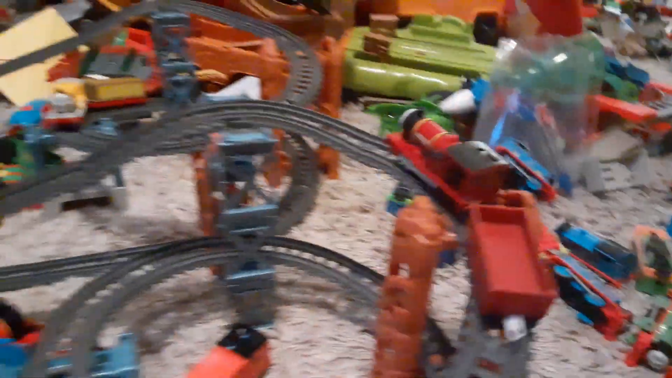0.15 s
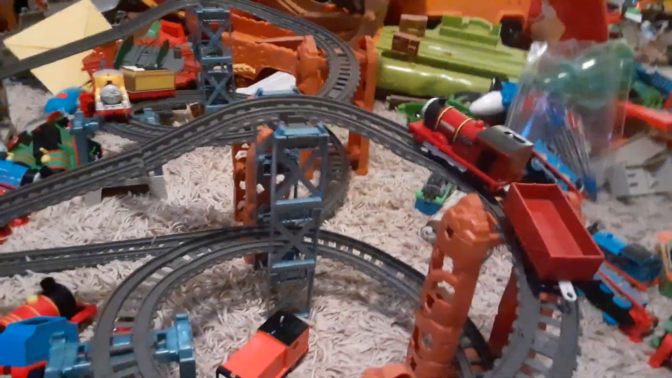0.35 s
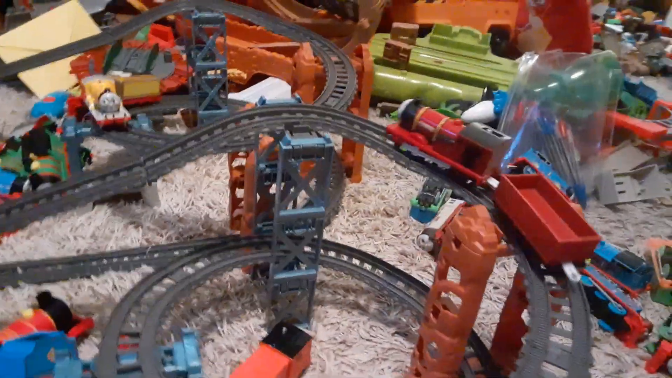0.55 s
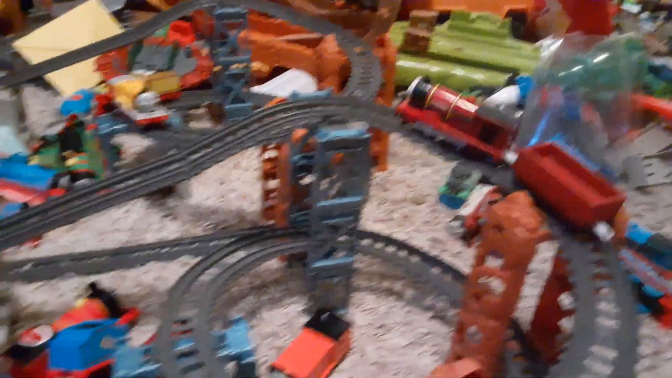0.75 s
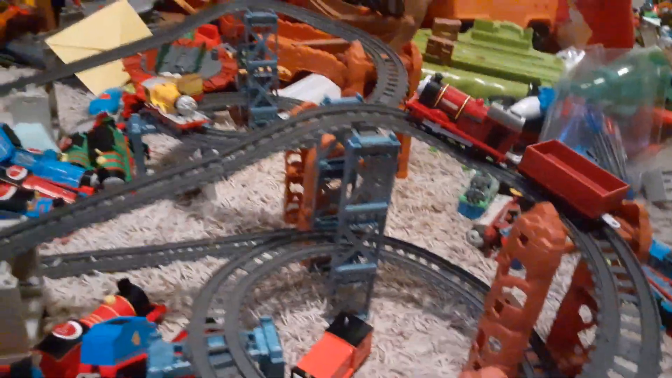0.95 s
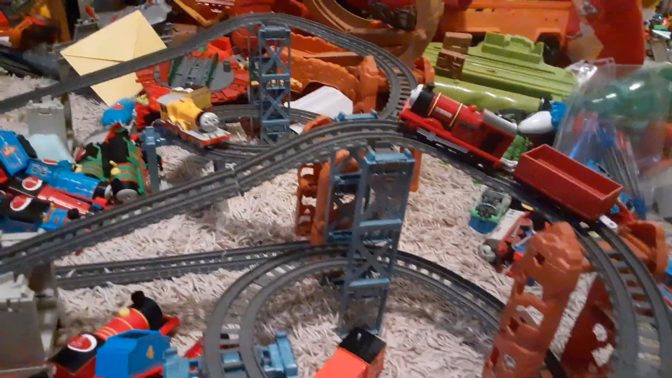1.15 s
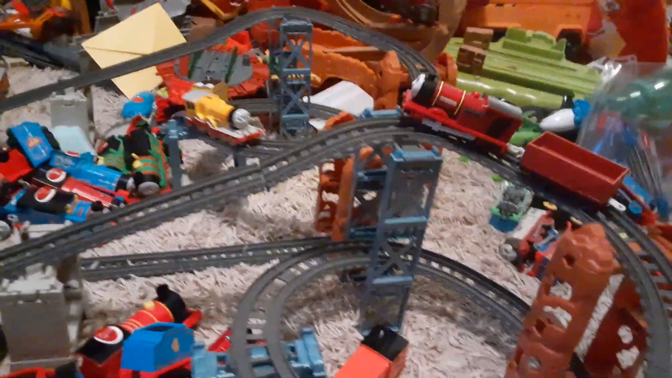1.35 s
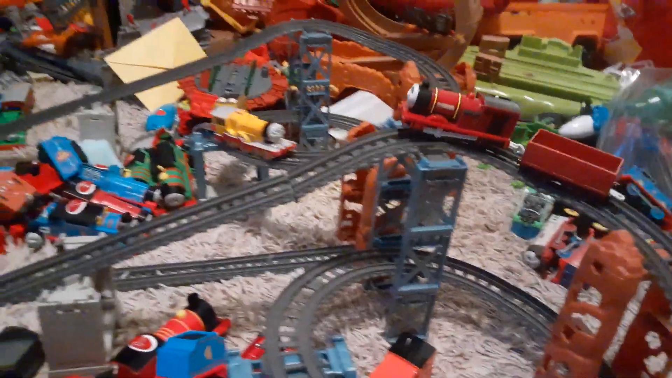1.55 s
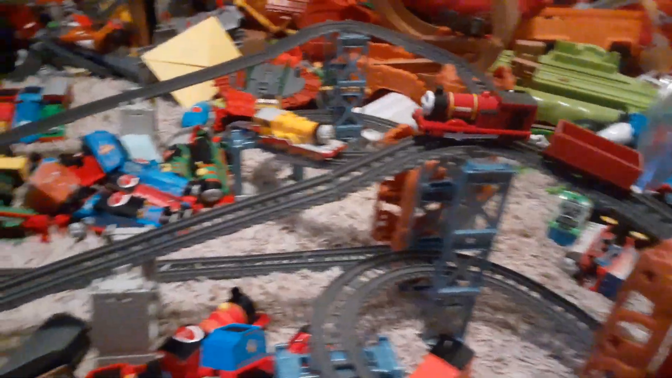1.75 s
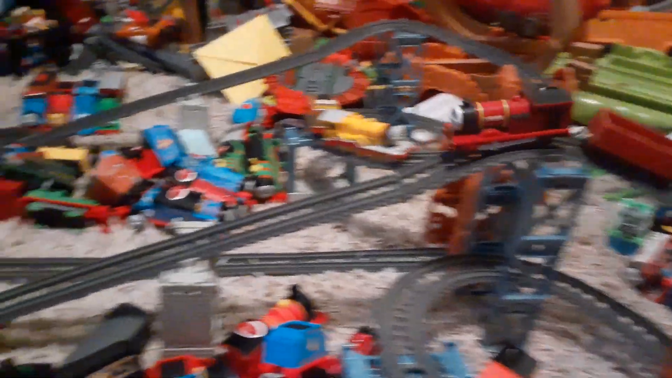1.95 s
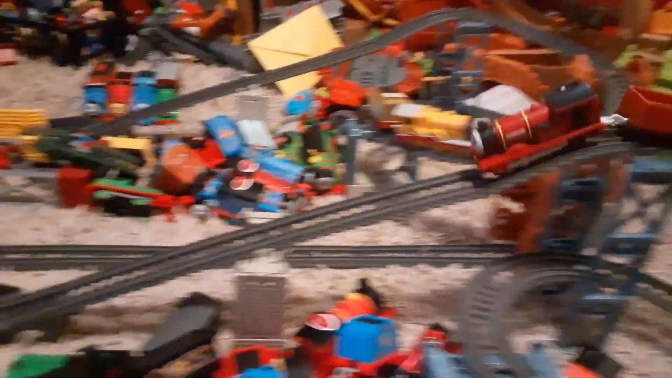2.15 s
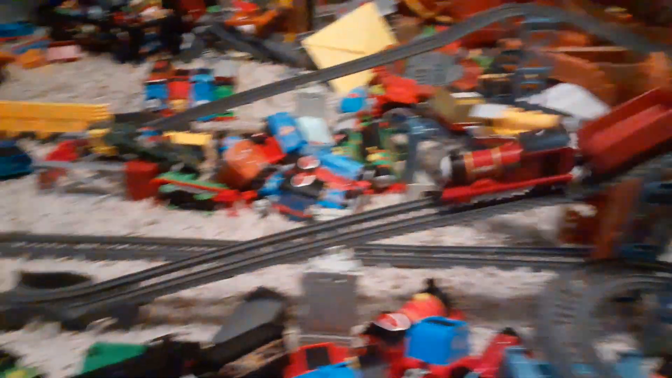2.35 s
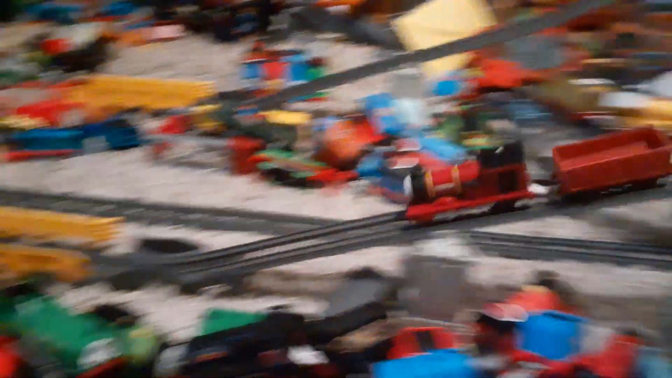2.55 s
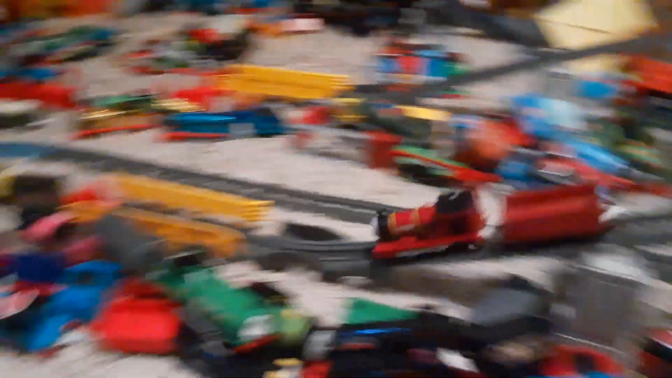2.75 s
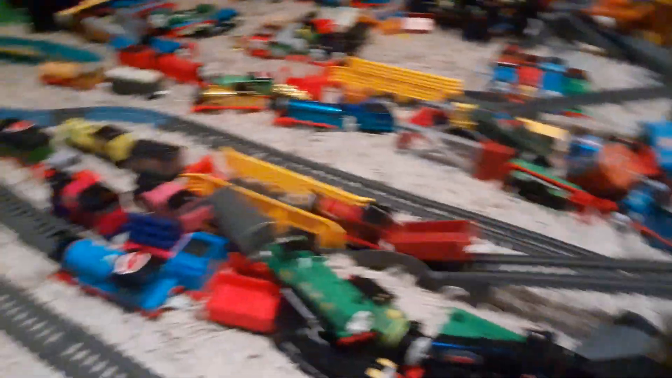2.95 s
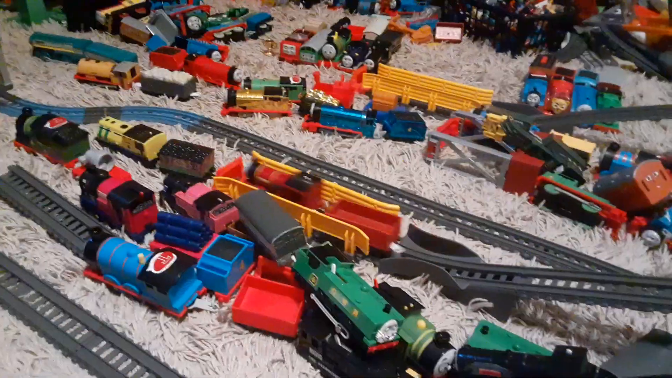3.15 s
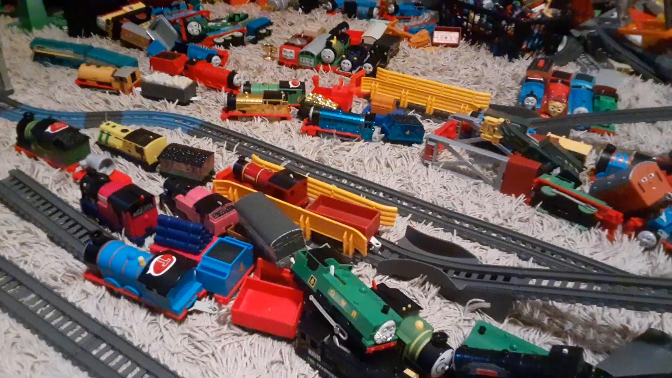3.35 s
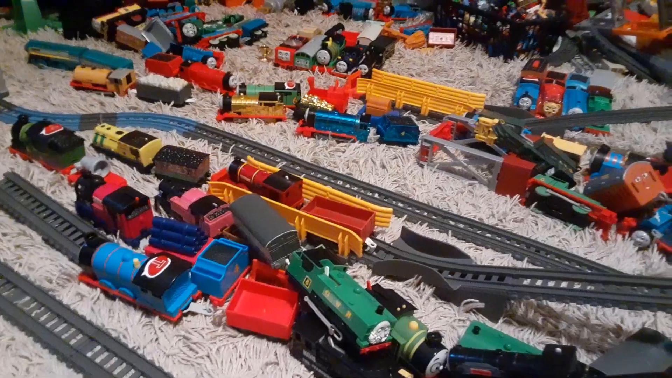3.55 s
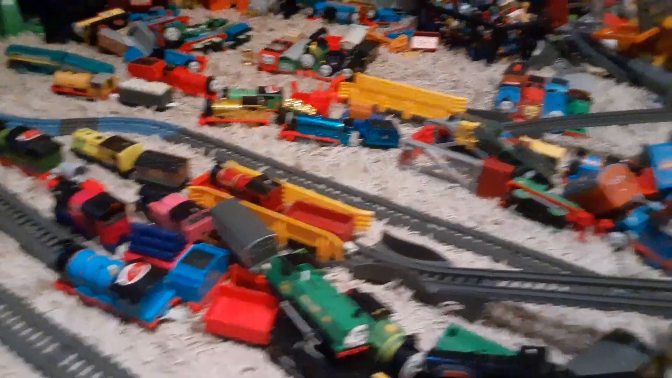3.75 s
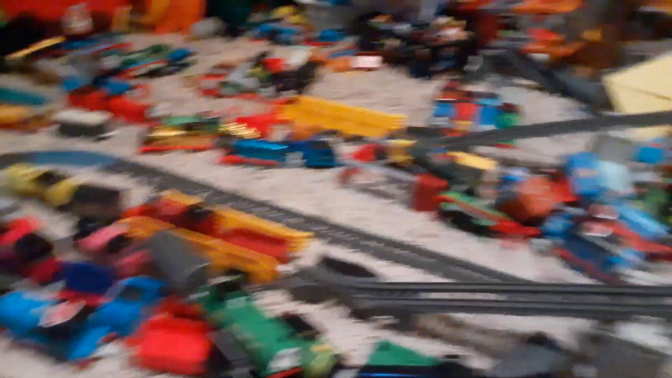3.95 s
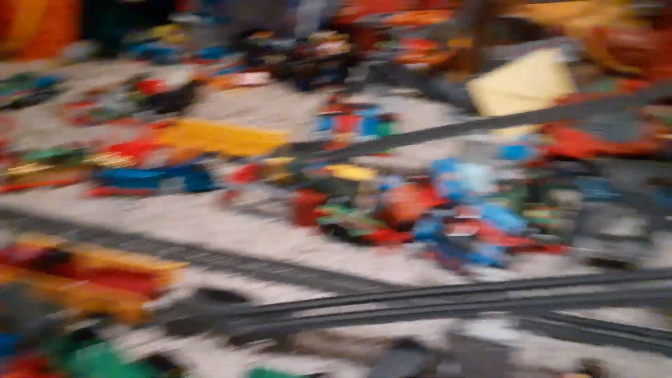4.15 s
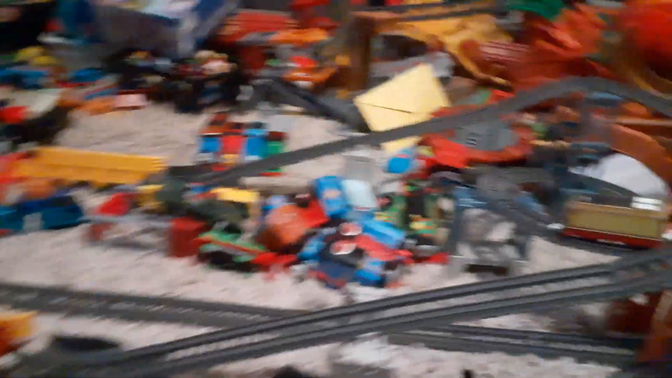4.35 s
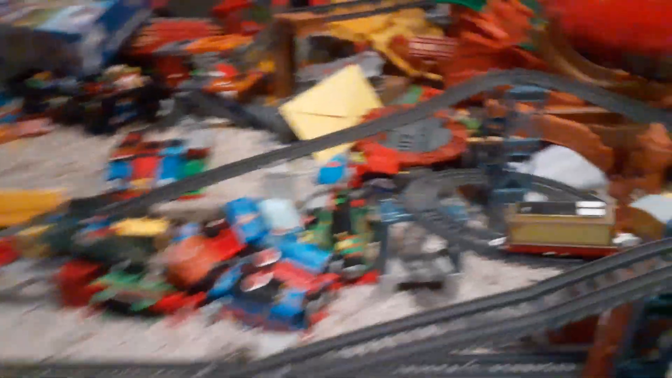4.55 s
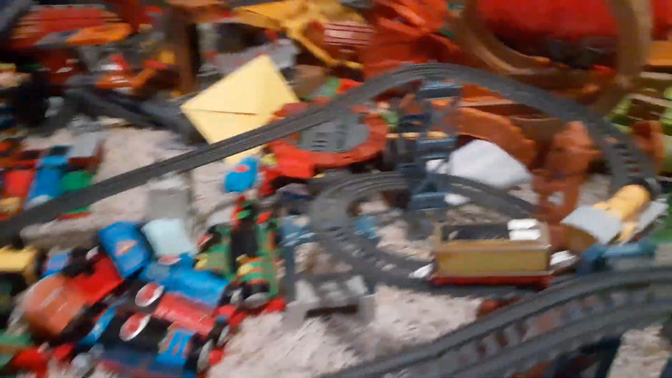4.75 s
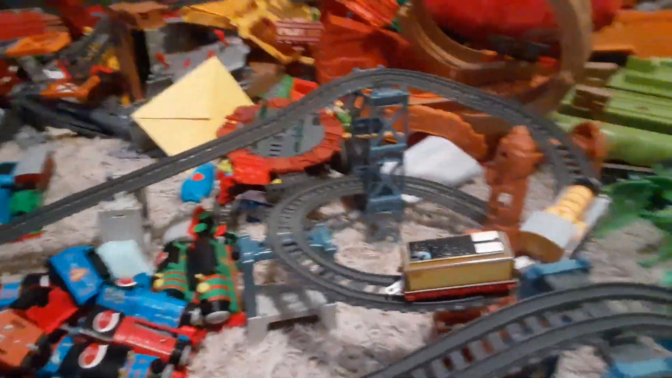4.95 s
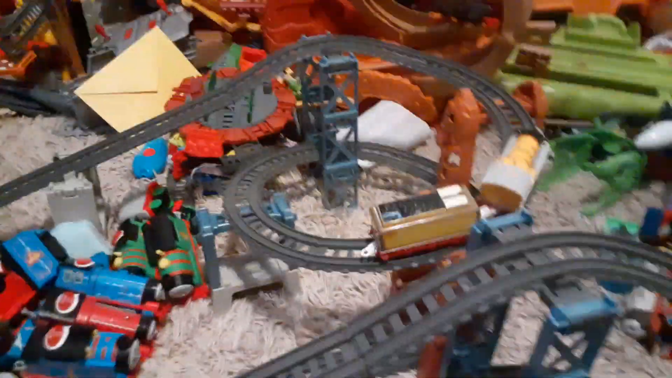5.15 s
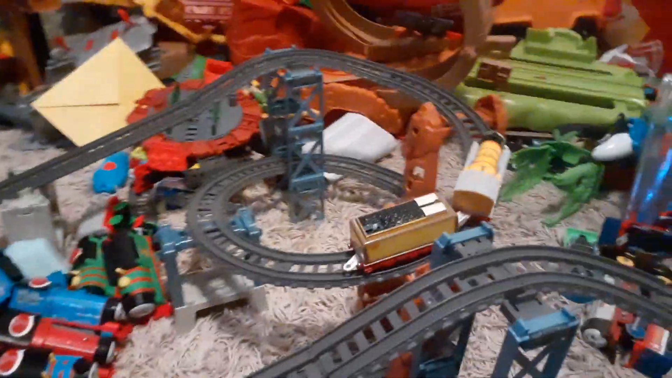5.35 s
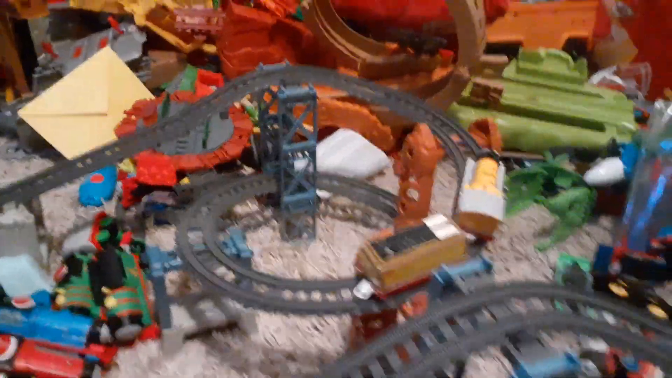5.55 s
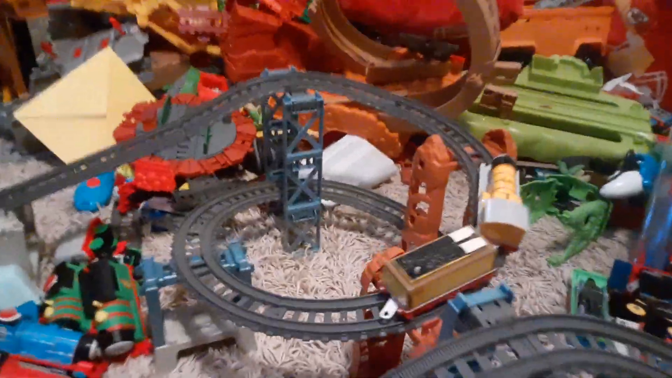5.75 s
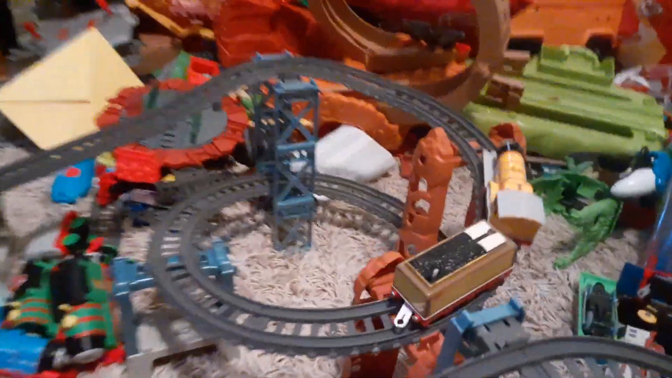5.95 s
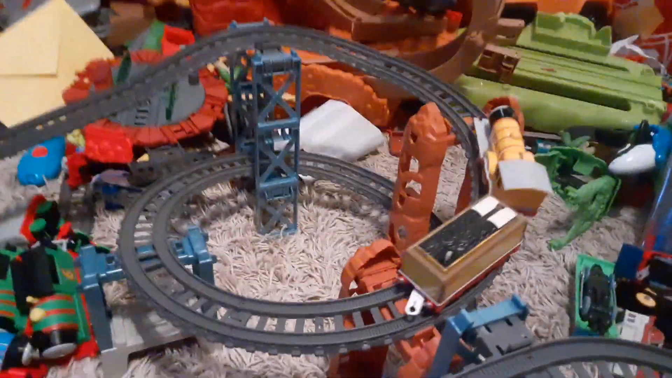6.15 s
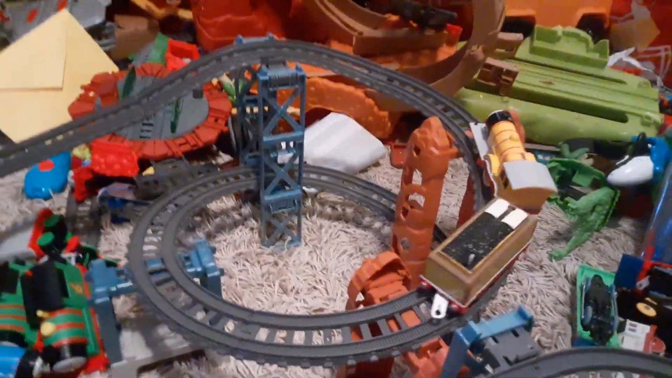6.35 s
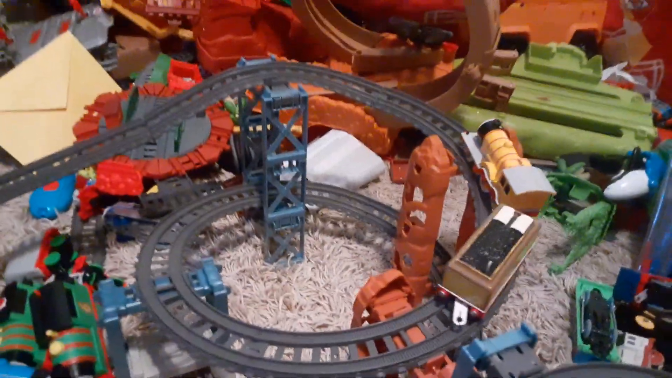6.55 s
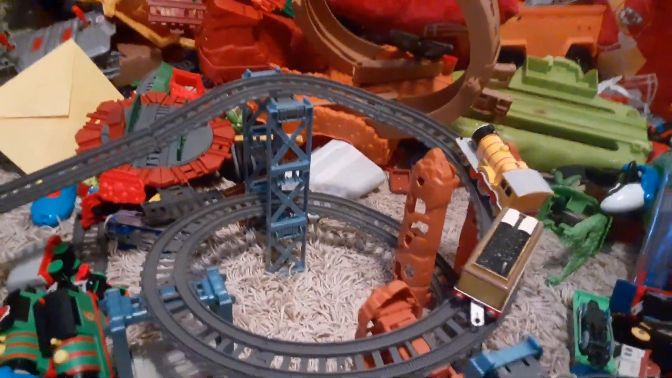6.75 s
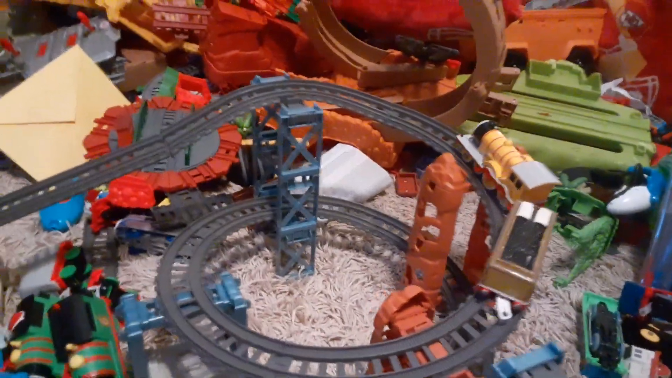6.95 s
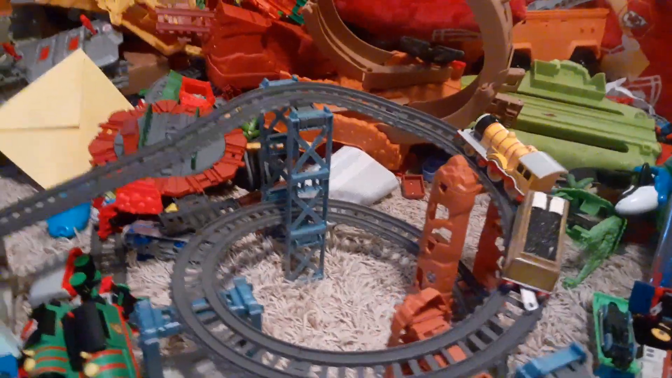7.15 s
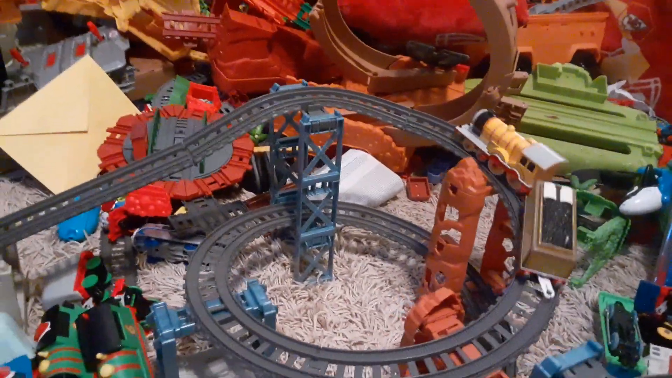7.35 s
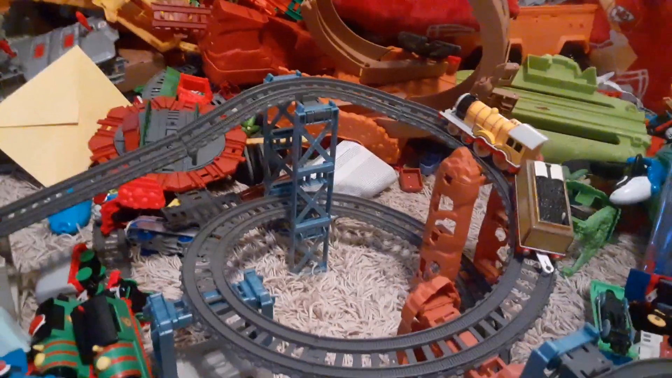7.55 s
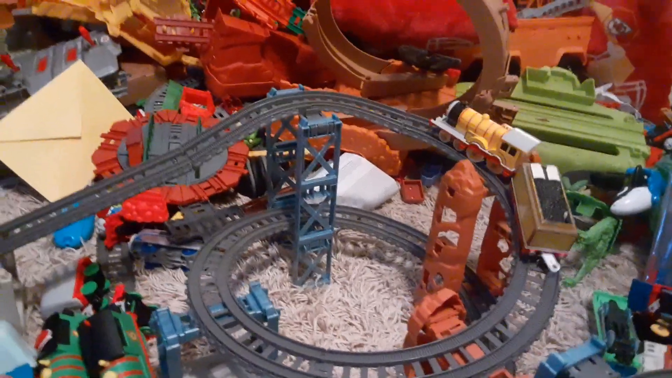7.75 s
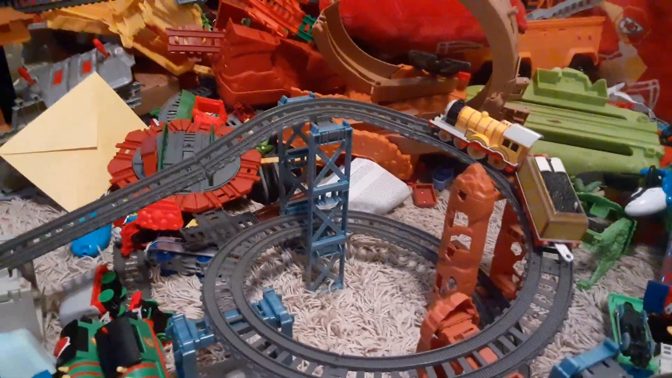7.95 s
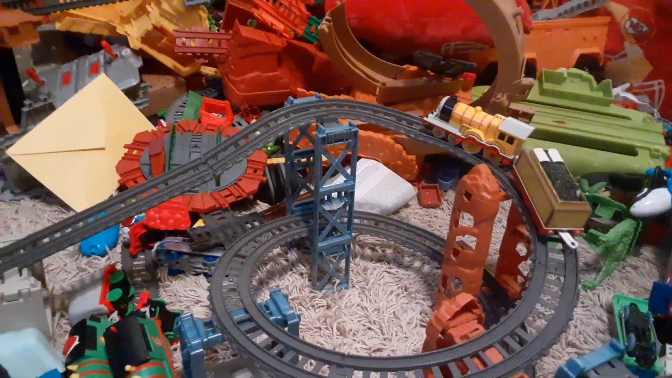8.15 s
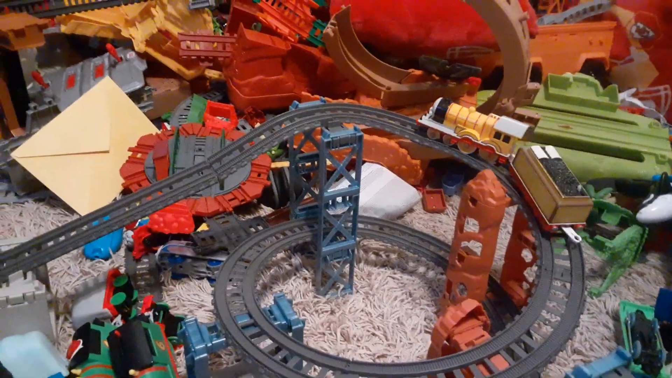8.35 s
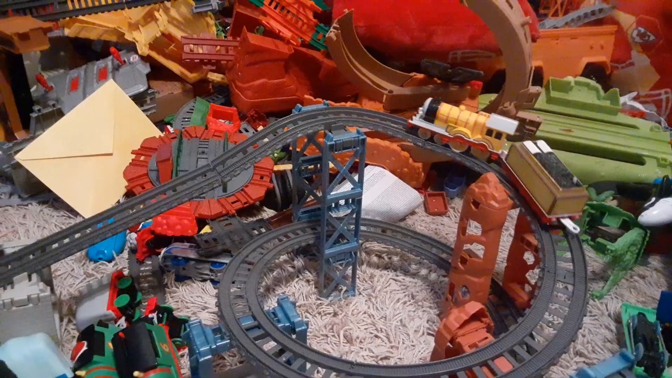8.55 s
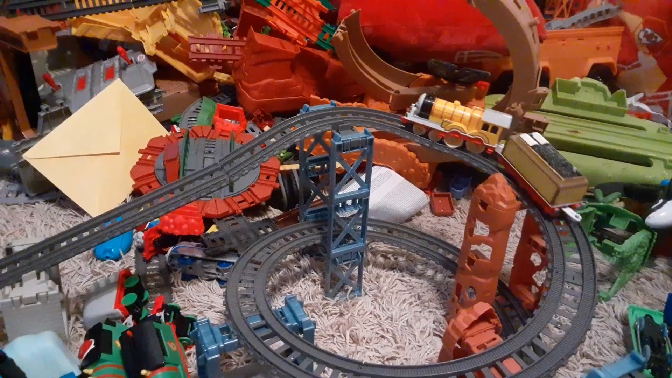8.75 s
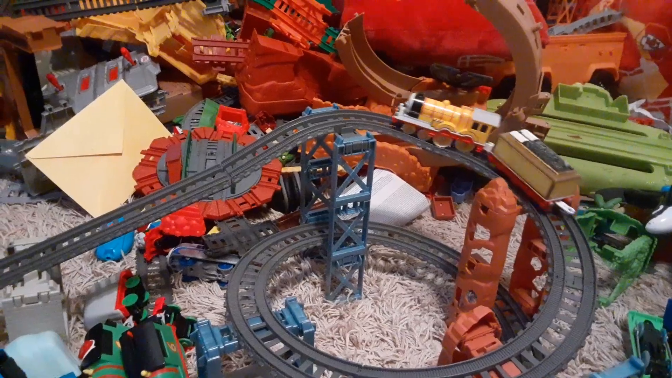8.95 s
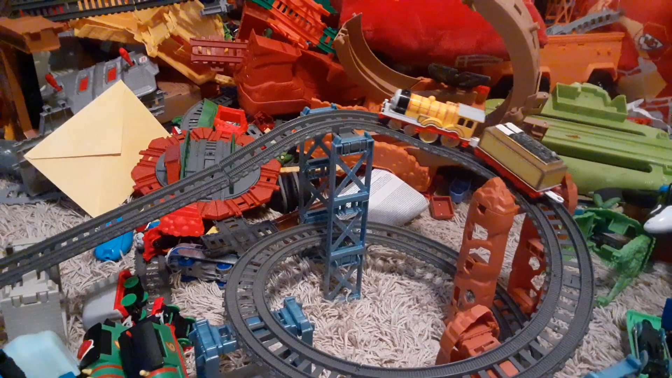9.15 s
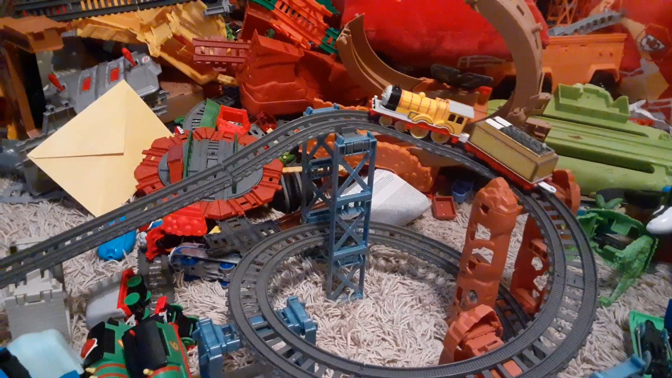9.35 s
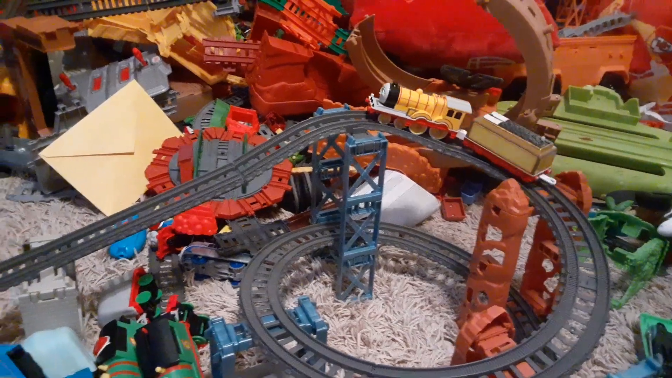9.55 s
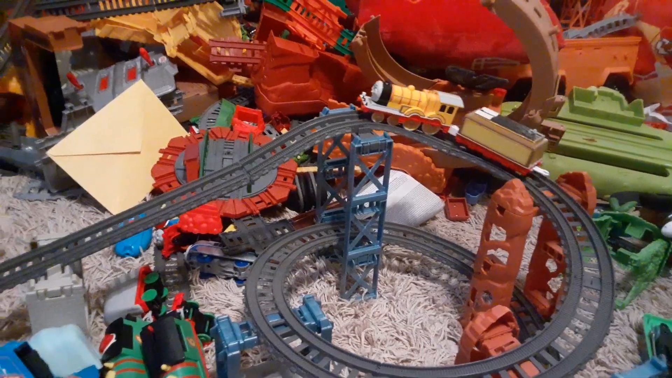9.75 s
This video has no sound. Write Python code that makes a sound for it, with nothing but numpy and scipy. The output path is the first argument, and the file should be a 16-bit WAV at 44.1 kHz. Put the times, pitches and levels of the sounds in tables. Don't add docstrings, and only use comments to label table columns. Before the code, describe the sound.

Close, dry indoor sound of two motorized toy trains on raised plastic track. The first is loud, hissy and gritty, rattling hardest around two to three seconds before dropping away. The second is faint, a thin buzzing whir with a rapid tick on each motor turn. Handling bumps, soft rubs, and small boxy wheel knocks punctuate it until the end.

```python
import sys
import numpy as np
from scipy import signal
from scipy.fft import rfft, irfft
from scipy.io import wavfile
from scipy.ndimage import uniform_filter1d

SR = 44100
rng = np.random.default_rng(int(sys.argv[2]) if len(sys.argv) > 2 else 0)


def transcribe(signal):
    frames = np.atleast_2d(signal).T
    limited = np.clip(frames, -1, 1)
    pcm = np.round(limited * 32767).astype(np.int16)
    wavfile.write(sys.argv[1], SR, pcm)


def nominal_scale(level):
    x = np.asarray(level, float) / 20
    return 10 ** x


N = 432180
TIME_S = np.arange(N) / SR
HZ = np.arange(N // 2 + 1) * SR / N + 1e-3
LEFT_RIGHT = np.array([[.5], [-.5]])

# [t/s, loudness/dB, weight on the track/dB, bearing to the left/dB]
FAST_PASSAGE = [(0.0, -32, 2.5, 3.5), (1.26, -30.5, -2, 3.5), (1.9, -32, 0.5, 1), (2.06, -37, 4, 1.5),
                (2.33, -27, 5.5, 0.5), (2.98, -26.5, 8, 4), (3.12, -30, 4.5, 3.5), (3.2, -36.5, 10.5, 2.5),
                (3.32, -39.5, 4, 4), (3.44, -52.5, 8, 7), (3.6, -86, 13, 3)]
# [t/s, loudness/dB, weight on the track/dB, bearing to the left/dB, casing ping/dB]
SLOW_PASSAGE = [(3.3, -50, -1, -4, -41), (3.6, -47, -1.5, -2.5, -28.5), (4.16, -49, -2.5, -4, -22.5),
                (4.4, -48, 4.5, -1, -20.5), (4.7, -45, 7, -2.5, -14), (4.83, -44.5, 5.5, -1, -18.5),
                (5.05, -42, 2.5, 2, -13), (5.62, -43.5, 2, 2, -16.5), (6.3, -42.5, 2.5, 0, -22.5),
                (6.58, -44, 1.5, -1, -47), (7.34, -42.5, 0.5, -0.5, -24), (7.69, -43, 1, 1, -29),
                (8.2, -44.5, 0.5, 0, -21), (8.65, -45, 2, -1.5, -24.5), (8.8, -42, 0.5, -0.5, -40),
                (9.8, -43, -2, 0.5, -42)]
# [level over loudness/dB, share of weight, left lean/dB, share of bearing]
FAST_RANGES = [
    (-20, 1.08, 5.5, 0.49),
    (-11.5, 0.65, 2, 0.29),
    (0.0, 0.13, 0.5, 0.98),
    (1.36, -0.086, -7.5, 0.98),
]
SLOW_RANGES = [
    (-11, 1.34, 2.5, 0.044),
    (-4.5, 0.27, 4, 0.77),
    (1, 0.15, 2, 0.063),
    (-0.5, 0.1, -3.5, 1.7),
]


def rms_one(x):
    return x / np.sqrt(np.mean(x ** 2) + 1e-20)


def in_time(rows):
    s, *columns = np.transpose(rows)
    return [np.interp(TIME_S, s, column) for column in columns]


def at_hz(points):
    points = np.array(points)
    return np.interp(np.log(HZ), np.log(points[:, 0]), points[:, 1])


def drift(rate):
    r = np.exp(-16 * np.pi * rate / SR)
    noise = rng.standard_normal(N // 8 + 4002)
    slow = signal.lfilter([1], [1, -2 * r, r * r], noise)[4000:]
    return np.interp(np.arange(N) / 8, np.arange(len(slow)), rms_one(slow))


def bursts(times, sizes, fade_s, rise_s=0.0001):
    clicks = np.full(N, 1e-18)
    samples = np.clip((np.asarray(times) * SR).astype(int), 0, N - 1)
    np.add.at(clicks, samples, sizes)
    rise, fade = np.exp(-1 / (rise_s * SR)), np.exp(-1 / (fade_s * SR))
    return signal.lfilter([1 - rise], np.convolve([1, -rise], [1, -fade]), clicks)


def ring(x, hz, t60):
    r, w = nominal_scale(-60 / (t60 * SR)), 2 * np.pi * hz / SR
    return signal.lfilter([0, np.sin(w)], [1, -2 * r * np.cos(w), r * r], x)


def two_ports(envelope, gain, lag):
    # [f/Hz, likeness 0-1]
    likeness = [(300, .9), (1000, .85), (2500, .62), (5000, .42), (12000, .15)]
    shared, left, right = rfft(envelope * rng.standard_normal((3, N)))
    alike = np.clip(at_hz(likeness), 0, 1)
    late = np.exp(-2j * np.pi * HZ * lag / SR)
    common = np.sqrt(alike) * shared * np.array([late, late ** 0])
    own = np.sqrt(1 - alike) * np.array([left, right])
    return irfft((common + own) * gain, N)


def ranges(curves, table):
    loud, weight, bearing = curves[:3]
    levels = [loud + db + share * weight for db, share, _, _ in table]
    leans = [lean_db + share * bearing for _, _, lean_db, share in table]
    return levels, leans


def train(curves, colour, shell, sides, contacts, lag, patchy_db):
    range_edges = [1800, 4000, 9000]
    levels, leans = curves
    modes_db = sum(db / (1 + (2 * (HZ - hz) / width) ** 2) for hz, width, db in shell)
    gain = nominal_scale(at_hz(colour) + modes_db)
    above = [1] + [1 / (1 + (edge / HZ) ** 8) for edge in range_edges] + [0]
    side_db = at_hz(sides)
    out = 0
    for k in range(4):
        part = gain * (above[k] - above[k + 1])
        tilt = side_db - np.sum(side_db * part ** 2) / np.sum(part ** 2)
        pair = two_ports(contacts[k], part * nominal_scale(LEFT_RIGHT * tilt), lag)
        pair = pair / np.sqrt(uniform_filter1d(contacts[k] ** 2, size=SR // 5))
        level_db = levels[k] + LEFT_RIGHT * leans[k] + patchy_db * drift(15.3)
        out = out + pair / np.std(pair.mean(0)) * nominal_scale(level_db)
    return out


def fast_train():
    # [f/Hz, density/dB per Hz]
    fast_colour = [(60, -50), (290, -32), (500, -23.5), (901, -21.5), (1060, -15), (1530, -12.5),
                   (2010, -8), (2760, -6), (3530, -5), (6830, -3.5), (7560, 1), (8980, -15), (12900, -6.5),
                   (15500, -15.5)]
    # [f/Hz, width/Hz, level/dB]
    fast_shell = [(1166, 18, -18), (1950, 150, 4), (2580, 160, 1.5), (3020, 75, -4.5), (4650, 500, 1),
                  (6550, 1000, 6.5)]
    # [f/Hz, left minus right/dB]
    fast_sides = [(60, -14), (130, 16), (290, 8), (640, -2), (1410, 1.5), (3100, 11.5), (6820, 12.5),
                  (15000, 2.5)]
    # [t/s, peak level/dB]
    rattles = [(0.201, -17), (.946, -24), (1.034, -25), (1.092, -13), (1.944, -32), (1.994, -23),
               (2.0128, -22), (2.0467, -18), (2.079, -10), (2.1111, -18), (2.1214, -14), (2.166, -23),
               (2.183, -15), (2.2702, -28), (2.3006, -18), (2.3056, -9), (2.375, -11), (2.4264, -9),
               (2.4478, -21), (2.4827, -21), (2.505, -18), (2.5381, -11), (2.55, -19), (2.5815, -19),
               (2.5889, -10), (2.6005, -8), (2.6174, -10), (2.632, -11), (2.6733, -10), (2.691, -20),
               (2.741, -24), (2.784, -21), (2.8, -10), (2.829, -14), (2.891, -20), (2.9207, -8.5),
               (2.962, -6), (3.023, -11), (3.032, -10), (3.0619, -11), (3.096, -11), (3.109, -21),
               (3.1312, -19), (3.1725, -11), (3.214, -24), (3.2345, -30), (3.2694, -20), (3.2904, -22)]
    throb = np.sin(2 * np.pi * 54.0 * TIME_S + 2.4 * drift(1.5))
    grit = nominal_scale(0.93 * drift(240) + 0.14 * drift(30) + 0.48 * throb)
    s, db = np.transpose(rattles)
    over = np.minimum(db - np.interp(s, *np.transpose(FAST_PASSAGE)[:2]), 15)
    sharp = grit + bursts(s, nominal_scale(over - 9), 0.0036, rise_s=0.00048)
    dull = grit + bursts(s, nominal_scale(over - 16), 0.0054, rise_s=.0015)
    curves = ranges(in_time(FAST_PASSAGE), FAST_RANGES)
    return train(curves, fast_colour, fast_shell, fast_sides, [grit, dull, sharp, sharp], lag=2.82, patchy_db=.75)


def slow_train():
    # [f/Hz, density/dB per Hz]
    slow_colour = [(290, -37.5), (500, -26), (839, -21), (968, -8), (1270, -4.5), (1750, -14), (2840, -16),
                   (3430, -10), (4700, 4.5), (6550, 13.5), (9370, -7.5), (11500, -1), (15500, -2.5)]
    # [f/Hz, width/Hz, level/dB]
    slow_shell = [(1176, 150, -2.5), (1992, 32, 5.5), (2845, 600, 9), (6370, 100, -4.5)]
    # [f/Hz, left minus right/dB]
    slow_sides = [(60, 12), (130, 30), (290, 31), (640, 6), (1410, 4.5), (3100, 5), (6820, 4.5),
                  (15000, 11)]
    # [t/s, turns per s]
    motor_speed = [(3.19, 51.04), (3.75, 52.82), (3.95, 50.51), (4.12, 48.37), (4.78, 48.46), (5.63, 49.05),
                   (5.92, 50.74), (6.16, 47.51), (6.31, 50.08), (6.9, 50.19), (7.14, 52.88), (7.74, 48.18),
                   (7.93, 50.48), (8.41, 47.84), (8.7, 55.74), (9.01, 54.12), (9.33, 54.92), (9.8, 52.73)]
    # [t/s, level over the others/dB]
    odd_ticks = [(4.5799, -3), (4.6015, 0.5), (4.643, 3.5), (4.664, 0), (4.684, 0), (4.973, -3),
                 (4.7241, 2.5), (4.788, 3.5), (4.8087, -1), (4.8716, 3.5), (4.9336, 2.5), (4.993, -1),
                 (5.0742, 1.5), (5.0953, 3), (5.136, -1), (5.157, -6), (5.24, -2), (5.3013, 2),
                 (5.3438, 2.5), (5.3634, 2), (5.3828, 0), (5.4033, -1), (5.567, 2), (5.5877, 2), (5.649, 3),
                 (5.6694, 1), (5.7303, 3), (6.0085, 4), (6.1115, 2), (5.9292, 4), (5.9487, 2.5),
                 (5.988, -2), (6.091, 4), (6.132, 3.5), (6.216, 3), (4.83, -4), (4.767, 3), (4.747, -1),
                 (5.035, -2.5), (5.178, 4), (5.199, 1), (5.219, 2), (5.504, -1), (3.445, 0), (6.175, 4),
                 (6.195, 4), (6.2978, 3.5), (6.358, 4), (6.776, 4.5), (6.877, 5), (6.897, 4.5)]
    # [f/Hz, t60/s, level against the whir/dB]
    tooth_modes = [(4530, 0.0022, 12), (11900, 0.0021, 2.5), (14400, 0.002, 3), (6500, 0.0028, -2)]
    curves = in_time(SLOW_PASSAGE)
    first_tick_s = 3.1943
    turns = np.cumsum(in_time(motor_speed)[0] * (TIME_S > first_tick_s)) / SR
    chance = rng.standard_normal((int(turns[-1]) + 1, 3))
    at = np.interp(np.arange(len(chance)) + 1e-6, turns, TIME_S) - .0012 + 0.00014 * chance[:, 0]
    strength = nominal_scale(.6 * chance[:, 1])
    for s, db in odd_ticks:
        turn = np.argmin(np.abs(at - s))
        at[turn], strength[turn] = s, nominal_scale(db)

    whir = nominal_scale(0.8 * drift(200))
    tick_db = 12.5 - 0.38 * (curves[0] + 43)
    # level/dB, fade/s, rise/s of the tick in each range, low to high
    ticks = [(-8.5, 0.005, 0.002), (-10.0, 0.0017, .0006), (-2.0, 0.0015, 0.00025), (1.0, 0.001, .0002)]
    contacts = [whir + nominal_scale(tick_db + db) * bursts(at, strength, fade, rise) for db, fade, rise in ticks]

    ping_db = np.interp(at, TIME_S, curves[3]) + 1.0 * chance[:, 2] - 12.5
    strikes = np.zeros(N)
    strikes[((at - .0004) * SR).astype(int)] = strength * nominal_scale(ping_db)
    ping = ring(ring(strikes, 6220, 0.0018), 6540, 0.0025)
    ports = np.array([np.roll(ping, 5) * nominal_scale(1.5), ping * nominal_scale(-37.0)])

    bare = (strikes != 0) * nominal_scale(curves[0]) * bursts(at - .0005, strength, 0.0061)
    small_part = signal.butter(4, 2800, "high", fs=SR, output="sos")
    bare = signal.sosfilt(small_part, bare + 1e-18)
    for hz, t60, db in tooth_modes:
        uneven = nominal_scale(1.3 * np.array([drift(60), drift(60)]))
        ports = ports + nominal_scale(db) * ring(bare * uneven, hz, t60)
    return ports + train(ranges(curves, SLOW_RANGES), slow_colour, slow_shell, slow_sides, contacts,
                         lag=4.8, patchy_db=.8)


def clacks():
    # [t/s, peak level/dB, f/Hz]
    slaps = [(2.923, -25, 2110), (2.926, -22.5, 2720), (3.031, -27, 2890), (3.036, -29, 3350),
             (3.061, -27, 2780), (3.067, -28, 3320), (2.884, -26, 5270), (3.096, -29, 5300),
             (3.523, -40, 4560), (4.7, -34, 6900), (4.955, -35, 6030), (5.266, -34, 6060)]
    out = 0
    for s, db, hz in slaps:
        rough = bursts([s], 1, .006) * rng.standard_normal((2, N))
        out = out + nominal_scale(db - 13) * ring(rough, hz, .016)
    return out + 0.88 * out[::-1]


def knocks():
    # [t/s, peak level/dB]
    joint_drops = [(5.796, -51), (6.242, -56), (6.289, -49), (6.309, -47), (6.265, -52), (6.72, -47),
                   (6.758, -34.5), (6.788, -35.5), (7.188, -39.5), (7.474, -46), (7.211, -38), (7.241, -53),
                   (7.458, -33.5), (7.87, -37), (8.045, -35.5), (8.069, -29.5), (8.483, -38), (8.497, -36),
                   (8.767, -37), (8.797, -40.5), (9.426, -38)]
    s, db = np.transpose(joint_drops)
    soft = bursts(s, nominal_scale(db - 30.5), 0.00015)
    box_modes = [(441, 11.0, 0.051), (380, -0.5, 0.16), (582, -9, 0.12)]   # f/Hz, level/dB, t60/s
    return sum(nominal_scale(level_db) * ring(soft, hz, t60) for hz, level_db, t60 in box_modes)


def flexing_case(t, hz, snap_db):
    cycles = hz * t
    past = cycles + 0.27
    pace = np.where(cycles > 0, 0.9, 1.2)
    fading = np.exp(-np.where(past < 0, (past / 0.21) ** 2, (past / 0.9) ** 1.5))
    swing = -np.cos(2 * np.pi * cycles * pace - .45) * fading

    early = cycles + 0.648 - hz * np.array([[.0004], [-.0004]])
    falling = 3.17 * early - 4.5 * early ** 2
    snap = -nominal_scale(snap_db + 1.5) * np.cos(2 * np.pi * falling) * np.exp(-((early - .05) / 0.18) ** 2)
    contact = np.exp(-((early + 0.11) / 0.074) ** 2)
    crack = nominal_scale(snap_db - 4) * np.sin(2 * np.pi * 5.6 * early) * contact

    sagging = 62 * t + .5 * (1 - np.exp(-t / 0.024))
    tail_fade = np.exp(-t / 0.025) * np.clip(t / 0.027, 0, 1)
    tail = 0.3 * (140 / hz) ** 0.9 * np.sin(2 * np.pi * sagging) * tail_fade
    return swing + crack + snap + tail


def thumps():
    # [t of the trough/s, peak level/dB, f/Hz, snap/dB]
    blows = [(2.519, -30.5, 180, -23), (2.574, -29, 174, -16), (2.594, -30.5, 269, -12),
             (2.716, -38, 145, 7), (2.749, -36, 182, 2), (2.784, -33, 149, -17), (2.824, -25, 132, -5),
             (3.385, -43, 295, -19.5), (3.917, -31.5, 272, -17), (4.215, -35, 280, -17),
             (4.251, -37, 139, -3), (4.276, -23, 137, -3.5), (4.306, -23.5, 141, -4),
             (4.352, -22.5, 154, -6), (5.671, -41.5, 285, -14), (5.863, -37.5, 278, -19),
             (6.045, -20, 140, -6), (7.3713, -25.5, 250, 0), (7.389, -34, 156, -21), (7.671, -22, 135, -6),
             (7.769, -18.5, 138, -2), (8.483, -32, 308, -6)]
    # [t/s, peak level/dB, f/Hz]
    nudges = [(2.18, -54, 110), (2.299, -39, 184), (2.476, -35, 130), (2.499, -39, 124), (2.932, -39, 96.4),
              (3.43, -45, 181), (3.575, -53, 253), (2.43, -44, 220), (3.175, -44, 280), (4.375, -33, 259),
              (4.458, -48, 420), (5.17, -44, 180), (7.066, -50, 200), (9.235, -58, 150), (4.636, -44, 237),
              (5.565, -44, 320), (7.62, -37, 250), (7.41, -44, 160), (7.64, -43, 180), (7.715, -42, 90),
              (7.8, -44, 109.4), (3.988, -43, 290), (4.007, -47, 272), (4.028, -45, 167), (4.059, -45, 165),
              (4.122, -46, 153), (4.687, -45, 168), (5.029, -37.5, 140), (5.799, -46, 144),
              (7.337, -36, 115), (7.445, -33, 120), (7.485, -33, 142), (7.829, -41, 125), (7.931, -39, 156),
              (7.95, -46, 97), (7.972, -36.5, 113), (8.008, -36, 145), (8.122, -36.5, 103),
              (8.336, -40, 98), (8.389, -37.5, 132), (8.414, -38, 91), (8.947, -41.5, 96), (8.969, -45, 86),
              (9.094, -43.5, 106)]
    rebounds = [(s + 0.0297, db - 23, hz * 0.66) for s, db, hz, _ in blows if db > -26]
    soft = [(*row, -16) for row in list(nudges) + rebounds]
    t = np.arange(-600, 4400) / SR - np.array([[.0003], [-.0003]])
    out = np.zeros((2, N + 5000))
    for s, db, hz, snap_db in list(blows) + soft:
        lean_db = np.clip(0.2 * (db + 41), 0, 5) * LEFT_RIGHT
        start = round(s * SR) - 600
        out[:, start:start + 5000] += nominal_scale(db + lean_db) * flexing_case(t, hz, snap_db)
    return out[:, :N]


def rubbing():
    # [f/Hz, density/dB per Hz]
    rub_colour = [(15, -49), (25, -32), (43, -3.5), (129, -5.5), (204, -4.5), (309, -7.5), (420, -12),
                  (550, -27), (920, -37)]
    # [length/s, level/dB]
    grips = [(0.65, -67), (0.73, -74), (0.099, -60.5), (0.16, -47), (0.26, -50), (0.16, -62),
             (0.052, -59.5), (.12, -64), (0.074, -67), (0.23, -58.5), (0.11, -57.5), (0.25, -61.5),
             (.32, -70), (.04, -74), (.08, -74), (.04, -72), (.17, -52), (0.16, -50.5), (0.21, -54),
             (0.1, -62), (.06, -63), (.03, -73), (0.1, -70), (.05, -70), (.04, -70)]
    grip_starts = [0.0, 1.0, 2.18, 2.46, 2.68, 3.02, 3.41, 3.77, 3.96, 4.19, 4.63, 4.93, 5.56, 6.41, 6.74,
                   7.06, 7.32, 7.6, 7.91, 8.33, 8.94, 9.23, 9.41, 9.59, 9.72]
    in_db_per_s, out_db_per_s = 162, 126
    grip = nominal_scale(-79.5)
    for s, (length, db) in zip(grip_starts, grips):
        before = in_db_per_s * np.maximum(s - TIME_S, 0)
        after = out_db_per_s * np.maximum(TIME_S - s - length, 0)
        grip = grip + nominal_scale(db - before - after)
    lumps = nominal_scale(2.6 * drift(30))
    return grip * rms_one(two_ports(lumps, nominal_scale(at_hz(rub_colour)), lag=19.0))


def track_hum():
    slow = in_time(SLOW_PASSAGE)
    fast_db = ranges(in_time(FAST_PASSAGE), FAST_RANGES)[0][0] - 6.5
    slow_db = ranges(slow, SLOW_RANGES)[0][0] - 5.5 + 0.96 * slow[1]
    slow_db = slow_db - 4 * np.maximum(TIME_S - 7.7, 0)
    wheels = np.hypot(nominal_scale(fast_db), nominal_scale(slow_db))
    hum_colour = [(200, -40), (330, -1.0), (450, -3.0), (700, -7.5), (950, -11.0)]   # f/Hz, density/dB per Hz
    hum = two_ports(nominal_scale(5.5 * drift(31)), nominal_scale(at_hz(hum_colour)), lag=9.7)
    return wheels * rms_one(hum)


def turning(x, patchy_db):
    # [length/s, f/Hz, level/dB,
    # glide share per s]
    panels = [(0.86, 1420, 5, 0), (0.84, 1950, 5.5, -0.062), (1.25, 1724, 10.5, -0.033),
              (0.36, 2410, 8.5, -0.05), (0.21, 2080, 6, 0), (0.17, 1160, 4, 0), (0.71, 6800, 3, .03),
              (0.58, 4840, 4, 0.089), (0.76, 4640, 5, .04), (0.64, 7180, 5, 0.06), (0.4, 6070, 5.5, 0.03),
              (2.3, 5350, -0.5, 0.03), (0.7, 3440, -3, -.05), (1.25, 2370, -0.5, 0.013),
              (0.2, 7450, 6.5, -0.022), (0.4, 7800, 2.5, 0), (0.46, 6750, 2.5, 0.026), (0.18, 3000, 6, 0),
              (1.2, 2760, 4, .03), (0.57, 1620, 10, -0.0037), (0.23, 1180, 7, 0), (1.26, 3960, 6, -0.0072),
              (0.46, 5420, 6.5, -.05), (0.45, 1010, -16, 0), (0.63, 2630, -4, 0), (0.53, 430, 8.5, -0.02),
              (1.1, 2900, 4.5, 0.017), (0.086, 2800, 18, 0), (0.9, 1500, 6, -.03), (0.52, 7140, 6, 0.0086),
              (.7, 7400, 2, 0), (0.74, 3950, 4.5, 0.01), (1.4, 1100, 2.5, -0.021), (0.84, 3800, 2, 0.021),
              (0.43, 6400, 2.5, -0.03), (0.7, 1960, 2.5, 0), (1, 1900, -1, 0), (0.53, 5500, 3, -.05),
              (.6, 4950, 3, -.03), (0.34, 4700, 5, 0)]
    panel_starts = [0.0, 0.0, .97, 2.36, 2.72, 2.86, .05, .3, 1.04, .8, .9, -.6, 2.3, -.2, .66, 1.75, 2.5,
                    2.96, -.3, 3.45, 3.1, 3.42, 2.38, 3.42, .85, 6.58, 5.2, 3.3, 4.42, 6.95, 8.85, 7.9, 8.6,
                    6.8, 4.95, 7.05, 8.45, 5.5, 8.45, 3.56]
    # [length/s, f/Hz, level/dB, glide share per s]
    broad_sides = [(0.64, 4570, 7.5, 0.05), (.13, 4450, 7, 0), (0.46, 4600, 2.5, 0), (0.31, 2100, 1.5, 0),
                   (0.22, 3240, 4, 0), (0.35, 360, 0, 0), (0.24, 490, 5, 0), (0.24, 190, 3, 0),
                   (0.28, 560, 4.5, 0), (0.25, 460, 5.5, 0), (0.34, 450, -5, 0), (0.088, 600, 17, 0),
                   (0.48, 2900, -4, 0), (1, 2700, -3, 0), (0.26, 540, -3, 0), (.09, 510, 7, 0),
                   (.07, 400, -8, 0), (0.22, 200, -3, 0), (0.65, 1100, -6.5, 0), (0.45, 1020, -5, 0),
                   (0.5, 620, -6.5, 0.0068), (0.17, 230, -4, 0), (0.28, 350, -5.5, 0), (0.2, 6500, 3.5, 0),
                   (0.46, 3500, 0, 0), (.6, 2700, 2.5, 0), (0.47, 1740, 3, 0), (.22, 150, 7, 0)]
    side_starts = [4.15, 3.3, 2.4, 2.1, 0.0, 1.9, .35, 1.45, 2.8, 5.25, 9.05, 3.8, 8.3, 3.6, 3.5, 6.24,
                   7.51, 6.82, 4.3, .1, 5.55, 8.56, 9.5, 6.62, .9, 9.2, 5.3, .78]
    hz, s, frames = signal.stft(x, SR, nperseg=512)
    patches = rng.standard_normal(frames.shape)
    for _ in range(2):
        patches = uniform_filter1d(patches, size=45, axis=2)
        patches = uniform_filter1d(patches, size=3, axis=1)
    gain_db = patchy_db * rms_one(patches)
    for rows, starts, wider in [(panels, panel_starts, 1), (broad_sides, side_starts, 2.4)]:
        for start, (length, panel_hz, db, glide) in zip(starts, rows):
            centre = panel_hz * (1 + glide * np.clip(s - start - length / 2, -length, length))
            width = (61 + 0.029 * centre) * wider
            inside_s = np.minimum(s - start, start + length - s)
            facing = np.clip(inside_s / .18 + .5, 0, 1)
            on = facing > 0
            peak = np.exp(-((hz[:, None] - centre[on]) / width[on]) ** 2)
            gain_db[..., on] += db * facing[on] * peak
    return signal.istft(frames * nominal_scale(gain_db), SR, nperseg=512)[1][:, :N]


def scene():
    moving = fast_train() + slow_train() + rubbing() + track_hum()
    trains = turning(moving, patchy_db=1.87) + clacks()
    return trains + thumps() + knocks() * nominal_scale(np.array([[1.2], [-1.2]]))


def top_cut(x):
    return signal.sosfilt(signal.butter(12, 17040, fs=SR, output="sos"), x)


def record(dry):
    x = signal.sosfilt(signal.butter(4, 44, "high", fs=SR, output="sos"), dry)
    x = .8 * np.tanh(x / .8) * 1.03
    x = signal.sosfilt(signal.ellip(10, .1, 52, 15750, fs=SR, output="sos"), x)
    return top_cut(x)


dry = scene()
out = record(dry)
transcribe(out)
```